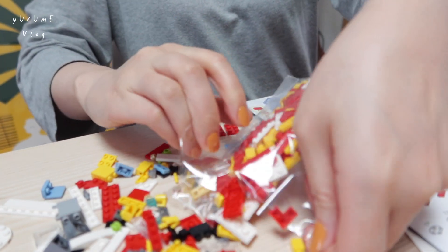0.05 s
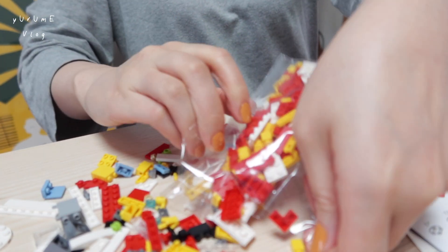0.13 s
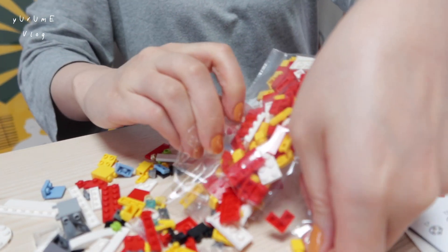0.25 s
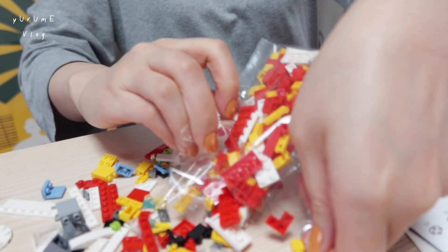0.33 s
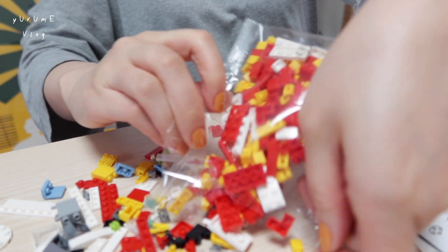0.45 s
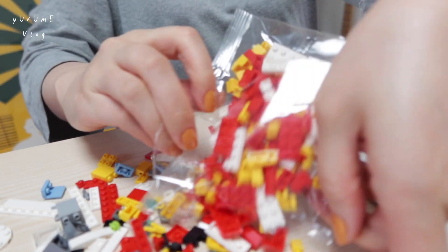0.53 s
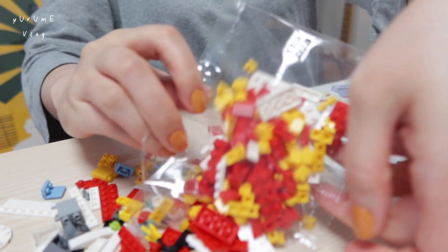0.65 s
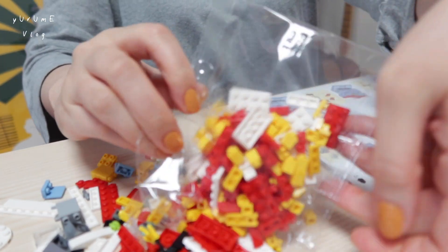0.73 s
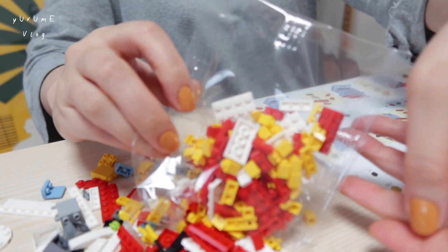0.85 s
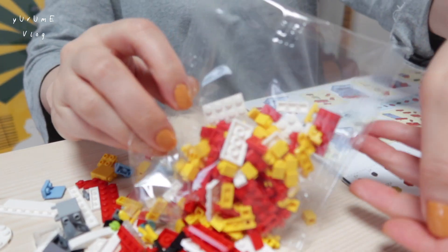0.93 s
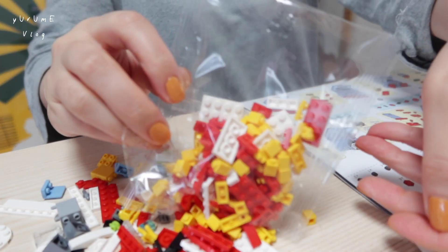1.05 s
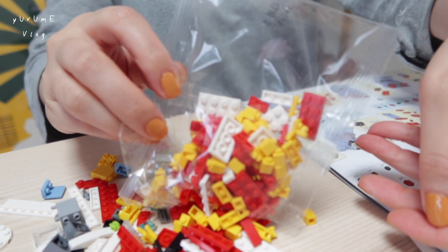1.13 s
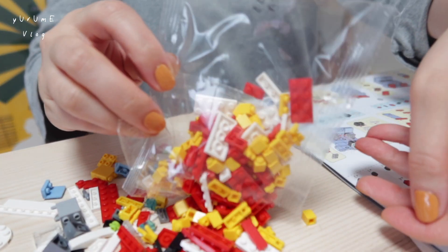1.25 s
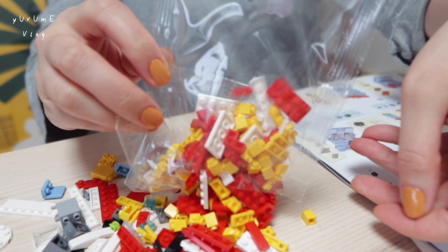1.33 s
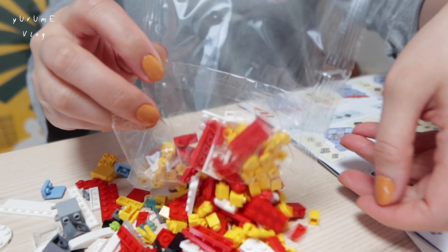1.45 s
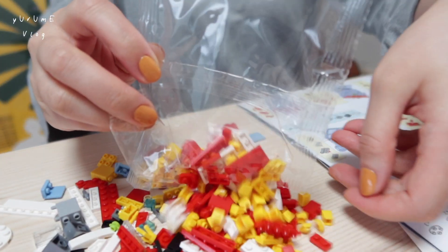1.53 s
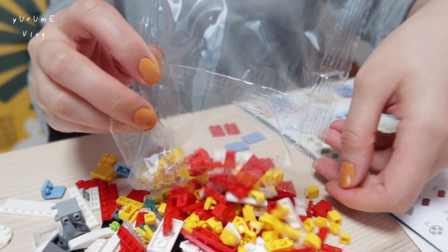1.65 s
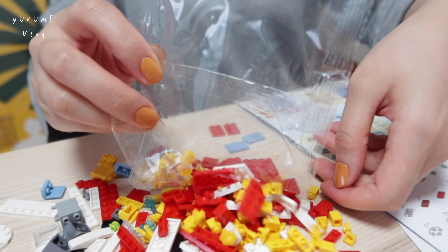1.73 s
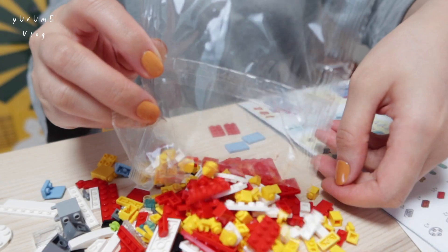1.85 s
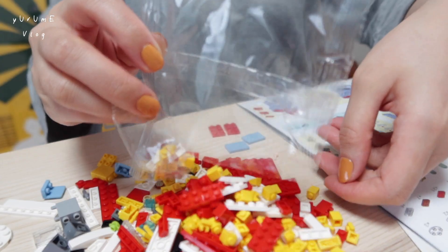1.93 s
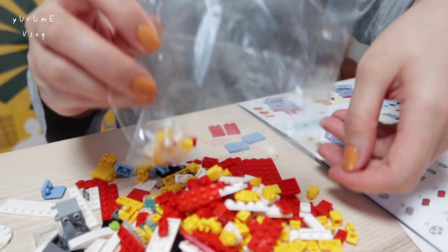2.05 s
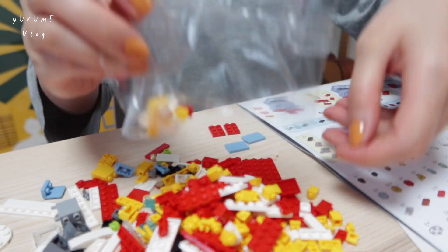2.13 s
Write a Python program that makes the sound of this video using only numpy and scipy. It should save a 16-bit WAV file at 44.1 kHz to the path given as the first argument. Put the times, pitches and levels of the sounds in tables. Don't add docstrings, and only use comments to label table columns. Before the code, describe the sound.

Small hollow plastic bricks rattle out of a stiff film bag onto a wooden table, heard close. Light crinkles and sharp film snaps start it; around 0.5-0.85 s the load shifts in a dense crackling rush with dull bumps. A sparse lull follows, then from 1.2 to 1.9 s bricks spill with loud bright clacks, peaking near 1.4-1.8 s. Last ticks fade by 2.1 s into faint fan hush.

```python
import sys
import numpy as np
from scipy import signal
from scipy.fft import rfft, irfft, next_fast_len
from scipy.io import wavfile
from scipy.ndimage import map_coordinates

SR = 44100
rng = np.random.default_rng(int(sys.argv[2]) if len(sys.argv) > 2 else 0)


def ratio_of_db(decibels):
    return 10 ** (np.asarray(decibels, float) / 20)


def master(y):
    cut = np.clip(np.atleast_2d(y).T, -1, 1)
    pcm = np.round(cut * 32767)
    wavfile.write(sys.argv[1], SR, pcm.astype(np.int16))


N = 97020
LAG_S = 0.001


def unit(x):
    return x / np.sqrt(np.mean(x ** 2) + 1e-20)


def along(points, hz):
    point_hz, value = np.transpose(points)
    return np.interp(np.log(hz + 1), np.log(point_hz + 1), value)


def filtered(x, response):
    size = next_fast_len(N + SR // 2)
    spectrum = rfft(x, size) * response(np.fft.rfftfreq(size, 1 / SR))
    return irfft(spectrum, size)[..., :N]


def strength(curve):
    return ratio_of_db(np.interp(np.arange(N) / SR, *np.transpose(curve)))


def noise_coloured(colour):
    return unit(filtered(rng.standard_normal(N), lambda hz: ratio_of_db(along(colour, hz))))


def rings(start_s, hz, t60_s, gain, size=400):
    values = np.broadcast_arrays(start_s, hz, t60_s, gain)
    start_s, hz, t60_s, gain = [np.ravel(v)[:, None] for v in values]
    t = np.arange(size) / SR
    gain = gain * np.sign(rng.standard_normal(gain.shape))
    tone = np.sin(2 * np.pi * np.minimum(hz, SR / 2.2) * t)
    wave = gain * tone * ratio_of_db(-60 * t / t60_s)
    at = np.clip(np.round(start_s * SR).astype(int), 0, N) + np.arange(size)
    return np.bincount(at.ravel(), wave.ravel(), N + size + 1)[:N]


def contacts(curve, count, spread_db, clump_db):
    level = strength(curve)
    density = level ** (2 * 0.25)
    wander = map_coordinates(rng.standard_normal(200), [np.arange(N) * 60 / SR])
    clumps = ratio_of_db(clump_db * wander)
    share = np.cumsum(density) / density.sum()
    luck = rng.random((count, 2))
    start_s = np.interp(luck[:, 0], share, np.arange(N) / SR)
    i = (start_s * SR).astype(int)
    sizes = ratio_of_db(-spread_db * np.log(luck[:, 1] + 0.03))
    sizes = sizes * clumps[i] * level[i] / np.sqrt(density[i])
    return start_s, sizes, np.sqrt(np.mean(level ** 2))


def crackle(curve, colour, count, cycles, spread_db, clump_db):
    start_s, sizes, level = contacts(curve, count, spread_db, clump_db)
    hz = 150 * 105 ** rng.random((count, 2))
    t60_s = np.minimum(cycles / hz + 0.0013, 0.012)
    even = np.sqrt(hz / t60_s / 1e6)
    gain = sizes[:, None] * ratio_of_db(along(colour, hz)) * even
    return level * unit(rings(start_s[:, None], hz, t60_s, gain, size=256))


def burst(start_s, db, hz, bright_db, count, cycles, edge_s, around_db):
    luck = rng.random((len(start_s), 3, count))
    step = (np.arange(count) + luck[:, 0]) / count
    start_s = start_s[:, None] + LAG_S
    body = rings(start_s[:, 0], hz, cycles / hz + 0.0046, ratio_of_db(db))

    near_hz = 600 * 10.5 ** step
    octaves = np.log2(near_hz / hz[:, None])
    away_db = np.where(octaves < 0, 8.5, -1.5) * octaves
    near_gain = ratio_of_db(db[:, None] + around_db + away_db)
    around = rings(start_s + 0.0003 * luck[:, 1], near_hz, cycles / near_hz + 0.003, near_gain)

    edge_gain = ratio_of_db((db + bright_db)[:, None] - 11 * step)
    edge = rings(start_s + 0.0003 * luck[:, 2], 6500 + 9000 * step, edge_s, edge_gain)
    return body + around + edge


# pitch_hz [Hz], level_db [dB per Hz]
HUSH_COLOUR = [(20, -8), (60, -4), (250, -10), (550, -11.5), (950, -12), (1200, 4.5), (1480, -40),
               (15800, -18)]


def hush():
    return ratio_of_db(-53.5) * noise_coloured(HUSH_COLOUR)


# pitch_hz [Hz], fade_by_60_db_s [s]
ROOM_FADE = [(200, 0.4), (2000, 0.33), (12000, 0.17)]


def room(x):
    hz, t, z = signal.stft(rng.standard_normal(SR // 2), SR, nperseg=256)
    fade = ratio_of_db(-60 * t / along(ROOM_FADE, hz)[:, None])
    tail = signal.istft(z * fade, SR, nperseg=256)[1]
    late = np.pad(x, (250, 0))
    return signal.fftconvolve(late, tail / np.linalg.norm(tail))[:N]


# pitch_hz [Hz], level_db [dB]
TABLE_COLOUR = [(20, -32), (60, 0.5), (220, 6.5), (450, -8), (900, -36)]


def table():
    return ratio_of_db(-20) * strength(HANDLING) * noise_coloured(TABLE_COLOUR)


def bumps():
    start_s, sizes, level = contacts(HANDLING, count=450, spread_db=3.0, clump_db=6.5)
    hz = 1150 * np.exp(0.197 * rng.standard_normal((len(start_s), 2)))
    knocks = rings(start_s[:, None], hz, 0.02, sizes[:, None], size=600)
    return ratio_of_db(-6) * level * unit(knocks)


# pitch_hz [Hz], level_db [dB], fade_by_60_db_s [s]
BRICK_TONES = [(1230, -15, 0.016), (3300, -3, 0.011), (4780, -1, 0.018), (5600, -4.5, 0.0069),
               (10495, -1.5, 0.021), (12000, -8.5, 0.023), (12600, -13, .008)]


def strikes(start_s, gain, bright_db, scatter, vary_db):
    hz, db, t60_s = np.transpose(BRICK_TONES)
    luck = rng.standard_normal((len(start_s), 2, len(hz)))
    tilt_db = np.where(hz > 7000, np.reshape(bright_db, (-1, 1)), 0)
    tone_hz = hz * (1 + scatter * luck[:, 0])
    tone_gain = gain[:, None] * ratio_of_db(db + tilt_db + vary_db * luck[:, 1])
    return rings(start_s[:, None], tone_hz, t60_s, tone_gain, size=512)


# time_s [s], level_db [dB]
POURING = [(0, -44), (.05, -42), (.13, -58), (.2, -43), (.29, -60), (.43, -55), (.5, -36.5), (.65, -25),
           (.84, -39.5), (.9, -51), (1.15, -52), (1.22, -37.5), (1.38, -36.5), (1.43, -27), (1.6, -23),
           (1.86, -29), (1.97, -42), (2.14, -68.5)]
# pitch_hz [Hz], level_db [dB]
KNOCK_COLOUR = [(200, -18), (600, -43), (2000, -23.5), (5500, -1), (7500, -12), (10500, 0.5),
                (13000, -15.5), (15500, -17.5)]
# start_s [s], level_db [dB], brightness_db [dB]
CLACKS = [(0.017, -15.5, 1.5), (.097, -28, 7), (0.188, -22, 3), (0.388, -29, 7.5), (0.9251, -30, 8),
          (.9515, -24, 0), (1.126, -22, 9.5), (1.225, -17.5, 4), (1.299, -25, 17), (1.401, -6, -2),
          (1.423, -10, 8.5), (1.479, 0, -9), (1.532, -11, 6), (1.569, 0, -12), (1.6152, -15, 15),
          (1.6236, -3, 3), (1.658, -11, 11), (1.711, -10, 5), (1.787, -1.5, -4.5), (1.84, -20, -5),
          (1.9205, -6.5, -0.5), (1.987, -20.5, 0.5), (2.012, -29, -3), (2.028, -25, -8), (2.06, -34, -4),
          (2.076, -34, -6)]


def bricks():
    knocks = crackle(POURING, KNOCK_COLOUR, count=8000, cycles=25.0, spread_db=2.0, clump_db=1.0)
    start_s, sizes, level = contacts(POURING, count=1300, spread_db=0.5, clump_db=-1.0)
    tones = level * unit(strikes(start_s, sizes, 0, scatter=0.0088, vary_db=5.0))

    start_s, db, bright_db = np.transpose(CLACKS)
    pings = strikes(start_s + LAG_S, ratio_of_db(db - 14.5), bright_db, scatter=0.027, vary_db=7.5)
    body_hz = np.full(len(start_s), 4300.0)
    cracks = burst(start_s, db - 11.5, body_hz, bright_db,
                   count=12, cycles=11.0, edge_s=0.0016, around_db=-7.5)
    return ratio_of_db(2) * knocks + ratio_of_db(-2) * tones + pings + cracks


# time_s [s], level_db [dB]
HANDLING = [(0, -41), (.06, -42), (.1, -49), (.17, -45), (.22, -39), (.29, -50), (.34, -41), (.42, -46.5),
            (.5, -31), (0.661, -23), (.8, -28.5), (.92, -41.5), (1.048, -37.5), (1.17, -39), (1.3, -34),
            (1.57, -27.5), (1.9, -39), (2.12, -62)]
# pitch_hz [Hz], level_db [dB]
FILM_COLOUR = [(160, -17), (400, 7.5), (1100, 2.5), (3000, 3.5), (5500, -5), (7500, -9), (11000, -17),
               (15500, -32)]
# start_s [s], level_db [dB], pitch_hz [Hz], brightness_db [dB]
SNAPS = [(0.1253, -12.5, 1720, -15), (0.159, -25, 2120, -19), (0.1736, -18.5, 2570, -30),
         (0.1963, -9.5, 4350, -26), (0.2063, -17.5, 2500, -24), (.222, -8, 1530, -22.5),
         (.249, -19.5, 1880, -29), (0.3105, -9.5, 2470, -18), (0.3157, -15.5, 1280, -16),
         (0.3257, -26, 2000, -11), (0.3301, -1, 3300, -10.5), (.384, -20, 1270, -17),
         (.428, -28.5, 820, -33), (.485, -15, 1150, -25), (.5, -21, 1300, -2), (.515, -6, 1810, -14),
         (.541, -16.5, 1300, -21), (.58, -12, 2500, -10), (.598, -5, 1230, -7.5), (.679, 5, 3530, -35),
         (0.713, -14, 2180, -22), (.793, -1, 1170, -25), (.855, -13, 1450, -6.5), (.995, -19, 930, -9),
         (1.035, -17, 890, -17), (1.075, -13, 1500, -22), (1.342, -13, 2380, -11),
         (1.366, -10.5, 1120, -19)]


def film():
    start_s, db, hz, bright_db = np.transpose(SNAPS)
    snaps = burst(start_s, db - 4.5, hz, bright_db,
                  count=12, cycles=5.4, edge_s=0.0062, around_db=-3.0)
    crackling = crackle(HANDLING, FILM_COLOUR, count=8000, cycles=14.5, spread_db=2.5, clump_db=2.5)
    return ratio_of_db(3) * crackling + snaps


def scene():
    low_cut_hz = 246
    near = filtered(film() + bricks() + bumps(), lambda hz: (1j * hz / (low_cut_hz + 1j * hz)) ** 3)
    return (near + ratio_of_db(-13) * room(near) + table() + hush())[None]


def roll_off(x):
    return signal.sosfilt(signal.butter(12, 16440, fs=SR, output="sos"), x)


def record(dry):
    top_hz = 15800
    mix = filtered(np.clip(dry, -1, 1), lambda hz: hz < top_hz)
    return roll_off(mix)


dry = scene()
out = record(dry)
master(out)
```